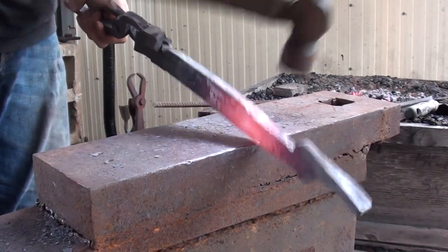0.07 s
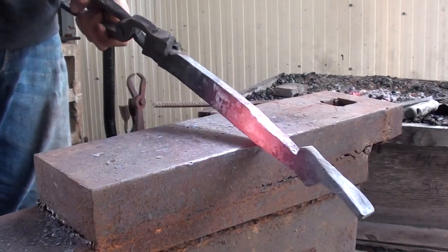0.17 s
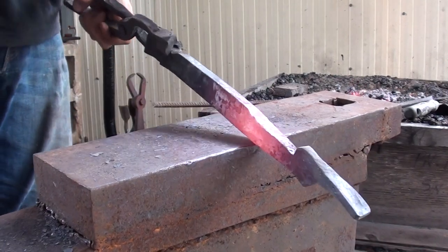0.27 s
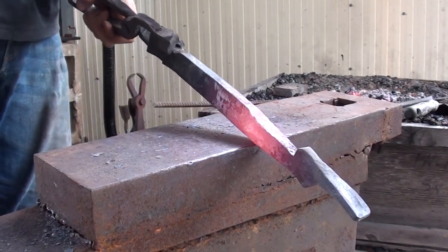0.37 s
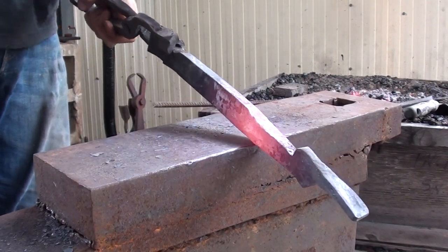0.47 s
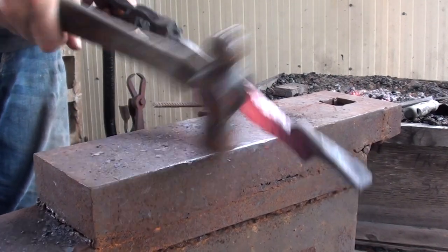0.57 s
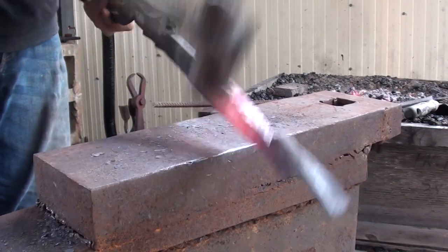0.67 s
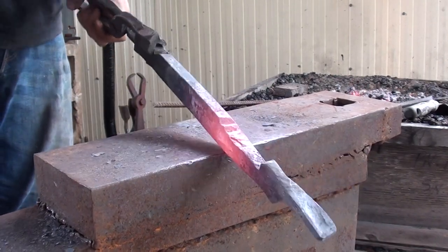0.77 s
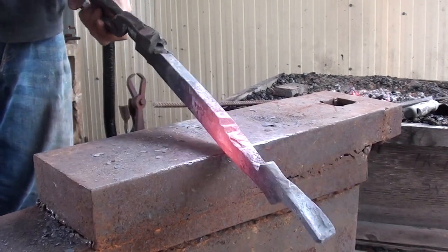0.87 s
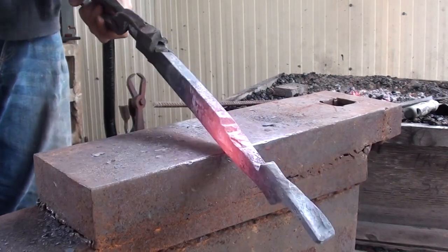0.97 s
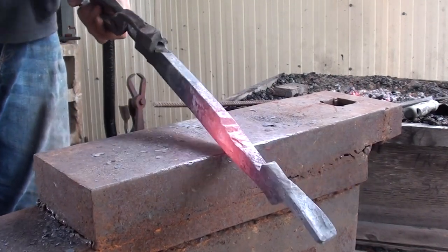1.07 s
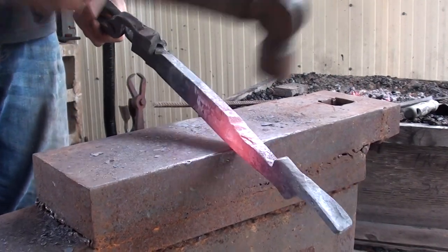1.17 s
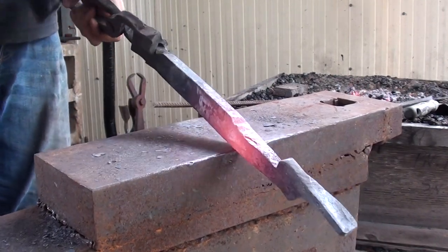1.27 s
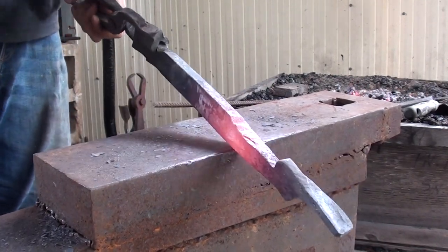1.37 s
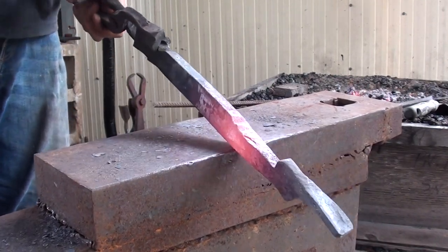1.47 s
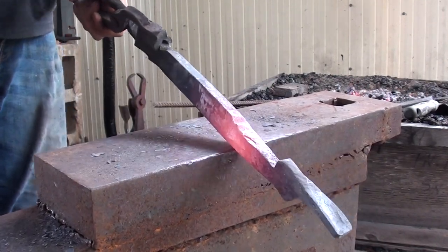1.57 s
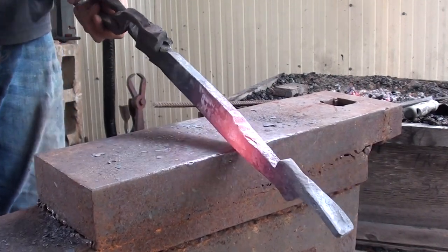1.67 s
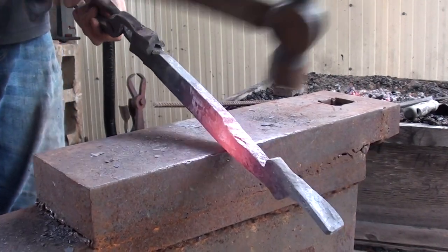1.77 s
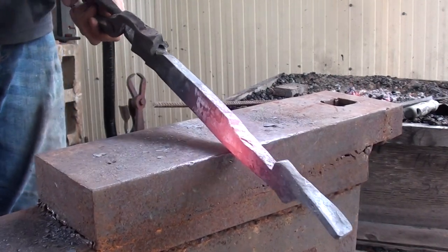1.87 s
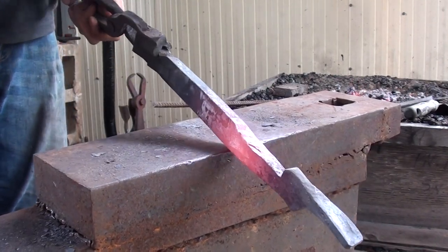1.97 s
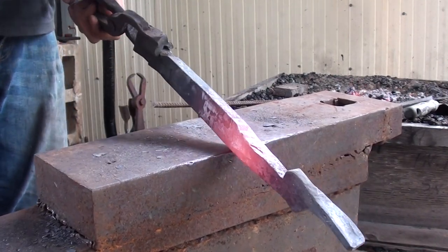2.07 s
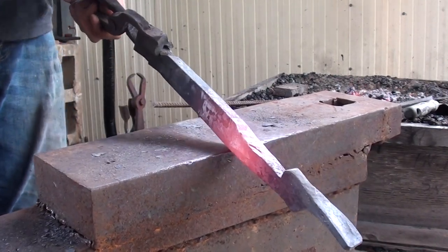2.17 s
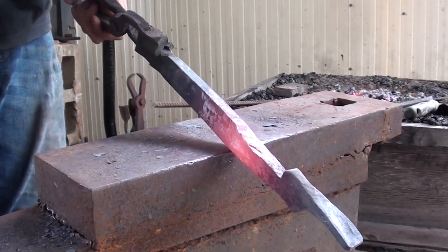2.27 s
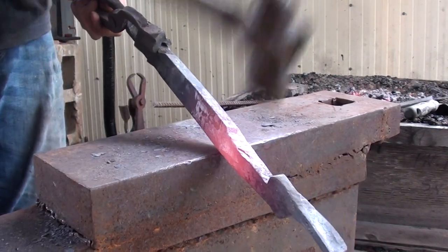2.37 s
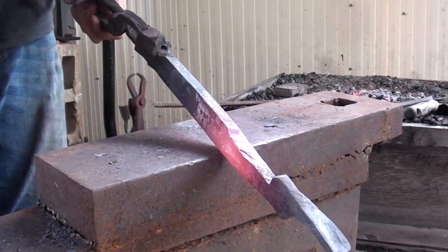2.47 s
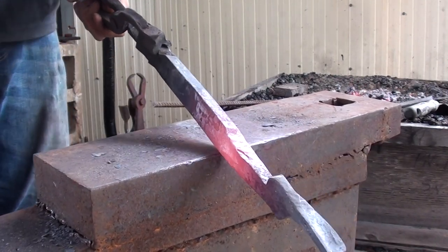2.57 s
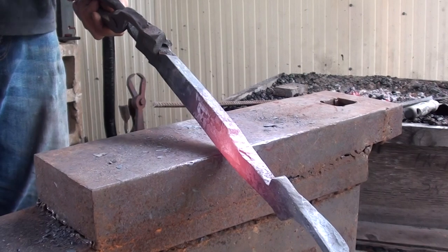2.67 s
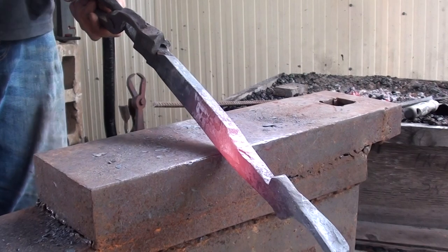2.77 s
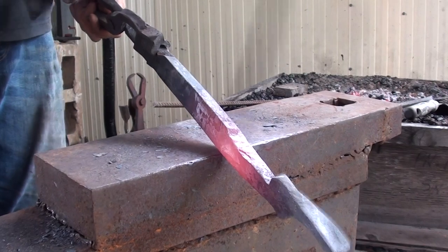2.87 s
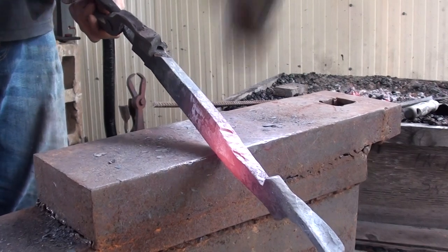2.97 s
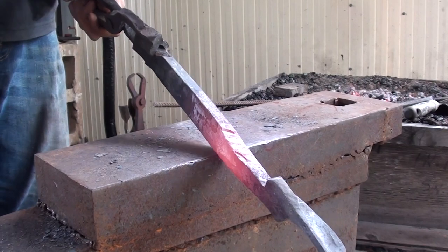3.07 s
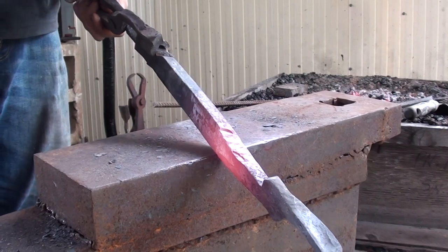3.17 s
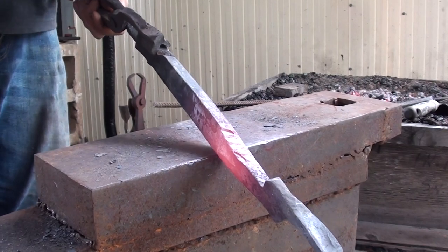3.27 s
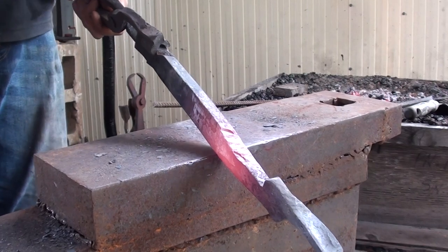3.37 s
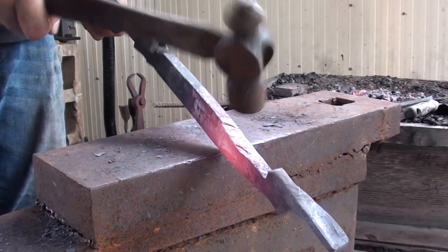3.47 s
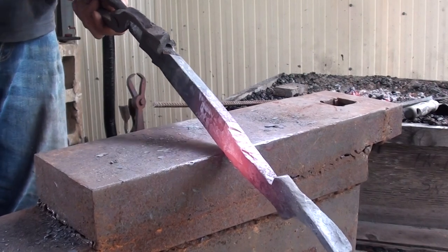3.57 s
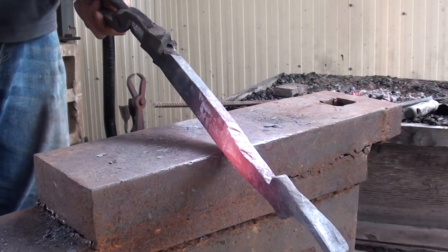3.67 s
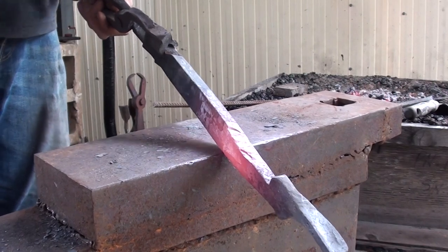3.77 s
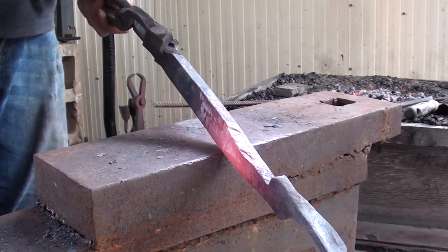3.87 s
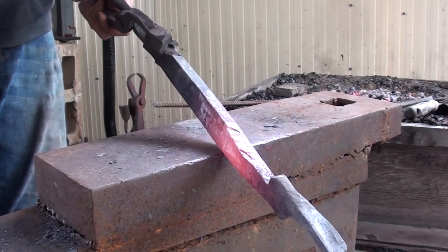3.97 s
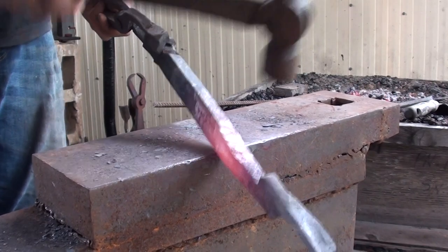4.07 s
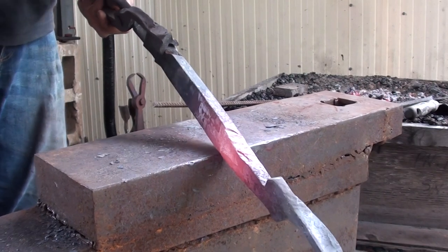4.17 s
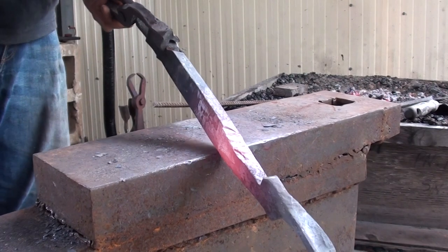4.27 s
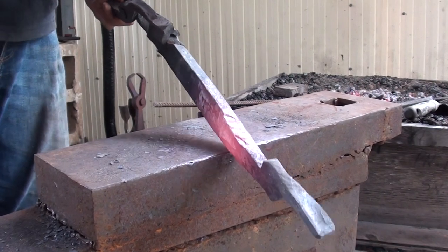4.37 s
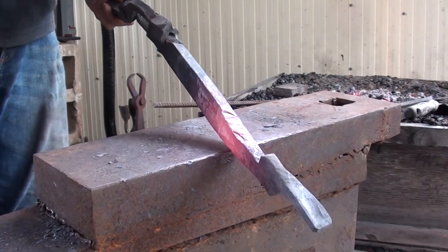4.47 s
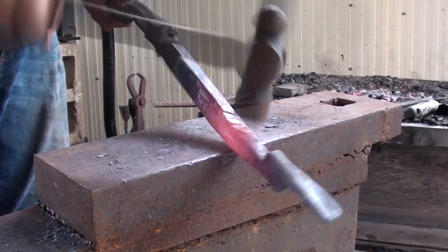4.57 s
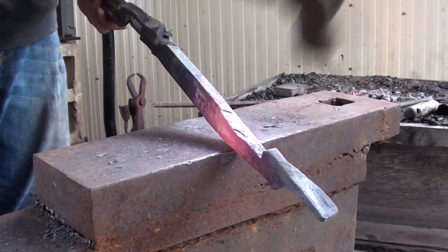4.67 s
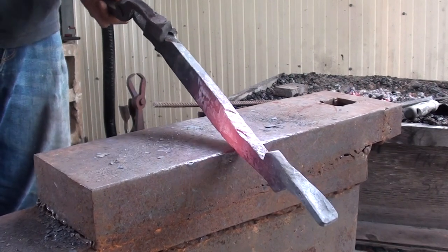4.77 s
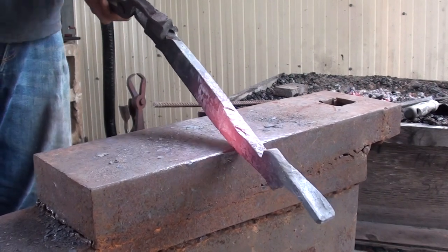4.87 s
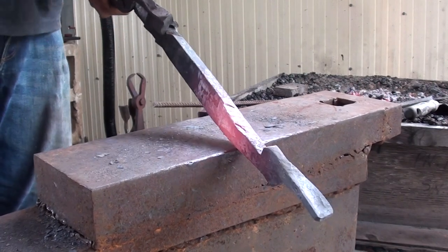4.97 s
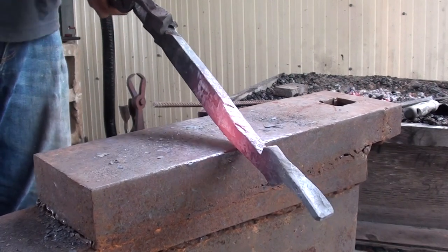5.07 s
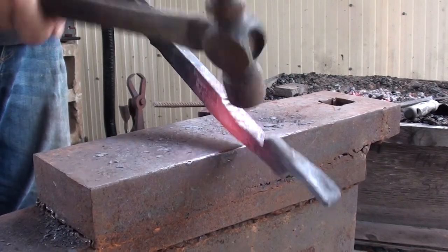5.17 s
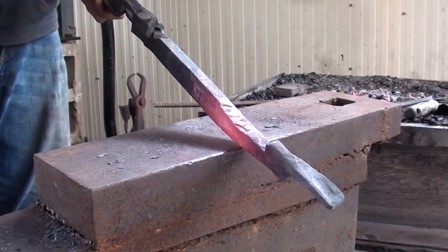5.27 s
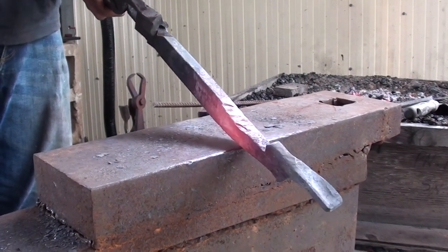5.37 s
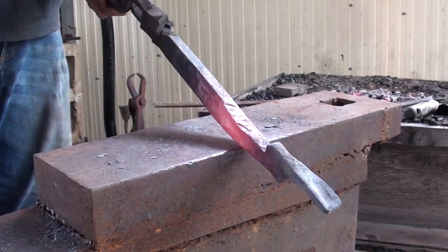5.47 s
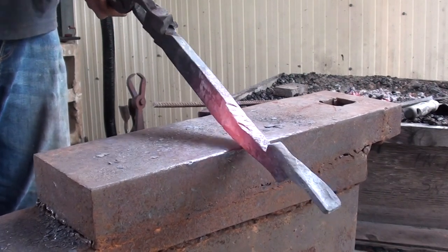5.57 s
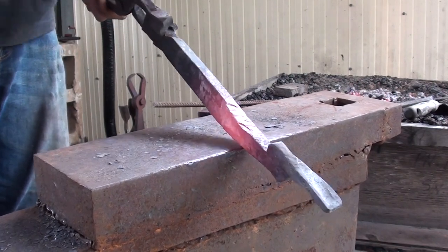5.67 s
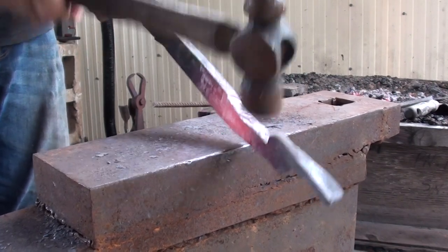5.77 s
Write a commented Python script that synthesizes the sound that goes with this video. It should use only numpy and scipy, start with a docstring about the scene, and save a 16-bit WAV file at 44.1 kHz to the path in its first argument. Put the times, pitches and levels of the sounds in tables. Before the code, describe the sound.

A hammer strikes a hot steel bar on an anvil eleven times at a steady pace, a little under two blows a second. Each blow is a sharp crack with a short, bright metallic ring that varies slightly. After the second, the hammer bounces lightly on the bare anvil. Faint gritty scrapes fall between the blows, over the quiet rush of a forge fire. The microphone is close, in a workshop with a short echo.

```python
"""In a smithy, a red-hot steel bar is hammered over the edge of an anvil in steady blows.
Each impact excites the modes of anvil, bar and hammer, coloured by the spot hit, and the room answers.
Once the hammer drops back lightly on the bare anvil. Between blows the bar scrapes and scale ticks
over the low rush of the forge. A nearby camera's limiter flattens the start of every blow."""
import sys
import numpy as np
from scipy import signal
from scipy.fft import rfft, irfft, next_fast_len
from scipy.io import wavfile
from scipy.ndimage import uniform_filter1d, minimum_filter1d, map_coordinates

SR = 44100
rng = np.random.default_rng(int(sys.argv[2]) if len(sys.argv) > 2 else 0)


def log_audio(samples):
    """Write samples as a 16-bit WAV file to the path given in sys.argv[1]."""
    # one column per channel
    frames = np.atleast_2d(samples).T
    # limit to full scale, then quantise
    limited = np.clip(frames, -1, 1)
    pcm = np.round(limited * 32767).astype(np.int16)
    wavfile.write(sys.argv[1], SR, pcm)


N = 256000

# Noise spectra. Each row: frequency in Hz, relative spectral density in dB.
FORGE_SPECTRUM = [(15, -61), (25, -34), (80, -14.5), (263, -18.5), (439, -19), (575, -20.5), (641, -18),
                  (840, -20.5), (1400, -22), (1520, -33.5), (1790, -24.5), (3820, -31.5), (6050, -27),
                  (6740, -30.5), (16000, -45.5)]
CRACK_SPECTRUM = [(30, -29), (150, -14), (450, -3.5), (1000, -4), (2100, 8.5), (3000, -1), (5500, 3),
                  (7500, 3.5), (10000, -3.5), (12500, -10.5), (15000, -17), (16800, -36)]
ECHO_SPECTRUM = [(25, -31), (70, -27), (120, -10), (240, -17), (450, -0.5), (900, 7), (1400, -2),
                 (2100, 13), (2800, -2.5), (3700, 7), (4500, 1), (7400, 4.5), (9500, -4), (15000, -26)]
FLAKE_SPECTRUM = [(2000, -16), (6000, -9), (8500, 0), (11000, -4), (16000, -12)]
GRIT_SPECTRUM = [(400, -22), (950, 0), (1500, -10), (2400, 0), (4000, 0), (7500, -2), (9200, -18),
                 (15000, -34)]
# Hammer blows. Each row: start in seconds, force in dB, spot along the bar in cm, anvil hum in dB.
BLOW_EVENTS = [(0.0353, 1, 7.9, -2.5), (0.5978, -0.5, 2.81, -5.5), (1.174, -0.5, 8.0, -0.5),
               (1.76, 0.6, 7.44, -1), (2.3375, 0, 14.56, -1.5), (2.912, -1.35, 7.29, -1),
               (3.484, 0, 3.2, -0.5), (4.06, 0.04, 15.29, 0), (4.6222, -3, 4.68, -3.5),
               (5.1913, -0.36, 11.97, -5), (5.7588, -0.6, 15.71, -4)]
# Modes of anvil, bar and hammer, in families that are excited together.
# Each row: frequency in Hz, relative level in dB, 60 dB decay time in seconds, build-up in seconds.
HUM_MODES = [(105.8, -38, 0.38, 0.009), (163.8, -28.5, 0.22, 0.009), (565.6, -24, 0.55, 0.045),
             (581, -20, 0.57, 0.032), (583, -46, 3.4, 0.026), (841, -27, 0.44, 0.0089),
             (969, -13, 0.1, 0.00058), (1008, -18.5, 0.37, 0.0035), (1211.5, -2, 0.24, 0.053),
             (1263, -27, 0.46, 0.028)]
CLANG_MODES = [(1629, 1, 0.21, 0.088), (1903.7, -2.5, 0.31, 0.0019), (2023, -12, 0.44, 0.00083),
               (2120, -8.5, 0.17, 0.00087)]
BELL_MODES = [(2371, -1, .35, .007), (2469, -16, .3, .005), (2928, -28, .33, .01)]
CHIME_MODES = [(3840, -20, .42, .005), (4170, -15, .05, .001), (4219, -17.5, .24, .002)]
CLASH_MODES = [(3450, -29, .33, .003), (3620, -26, .33, .005), (5290, -25, .3, .001), (5545, -21, .3, .001),
               (5960, -26, .35, .01), (6265, -25, .35, .01), (6900, -22, .14, .001), (7385, -25, .28, .001)]
PING_MODES = [(8770, -30, .3, .001), (8832, -27, .35, .001), (8880, -32, .3, .001)]
TINK_MODES = [(10750, -38, .33, .001), (10825, -36, .34, .001), (10885, -37, .33, .001)]
KNOCK_MODES = [(880, -22, .3, .008), (958, -17, .4, .008), (1023, -20, .35, .008)]
# Reverberation of the workshop. Each row: frequency in Hz, 60 dB decay time in seconds.
ROOM_T60 = [(100, 0.62), (500, 0.34), (1000, 0.47), (3000, 0.4), (7000, .39), (10000, 0.35), (15000, 0.34)]
# Small sounds between blows. Each row: start in seconds, level in dB.
FLAKE_EVENTS = [(.3445, -25.5)]
SCRAPE_EVENTS = [(0.3757, -33), (0.443, -30.5), (0.9123, -31), (1.1169, -37.5), (1.506, -34),
                 (2.0814, -29.5), (2.1864, -33), (2.6531, -32.5), (2.7516, -39), (3.7805, -32),
                 (4.3909, -27), (5.511, -34)]
REBOUND_EVENTS = [(0.7449, -15.5)]
# Likeness of the two channels. Each row: frequency in Hz, correlation from 0 to 1.
STEREO_COHERENCE = [(60, 1), (250, .985), (600, .95), (4000, .93), (8000, .97), (12000, .99)]
# Direction of the sound. Each row: frequency in Hz, left minus right level in dB.
STEREO_BALANCE = [(250, 0), (1000, 1.5), (2000, 1.3), (4000, .4), (12000, .1)]


def amp(db):
    """Amplitude grows tenfold for every 20 dB."""
    return 10 ** (np.asarray(db) / 20)


def along(points, hz):
    """Interpolation of (Hz, value) points on a logarithmic frequency axis."""
    frequencies, values = np.transpose(points)
    return np.interp(np.log(hz + 1), np.log(frequencies), values)


def filtered(x, response):
    """Linear filtering: the spectrum of x is multiplied by a frequency response."""
    n = x.shape[-1]
    padded = next_fast_len(n + 8192)
    return irfft(rfft(x, padded) * response(np.fft.rfftfreq(padded, 1 / SR)), padded)[..., :n]


def wobble(rate, n):
    """Smooth random modulation: a spline through rate knots a second."""
    knots = rng.standard_normal(1024)
    coarse = np.arange(0, n + 64, 64)
    return np.interp(np.arange(n), coarse, map_coordinates(knots, [coarse * rate / SR], mode="wrap"))


def noise(spectrum, n):
    """Partial coherence: coloured noise of rms 1, almost alike at two nearby points."""
    def response(hz):
        angle = np.arccos(np.clip(along(STEREO_COHERENCE, hz), -1, 1)) / 2
        return amp(along(spectrum, hz)) * [np.cos(angle), np.sin(angle)]
    mid, side = filtered(rng.standard_normal((2, n)), response)
    pair = np.array([mid + side, mid - side])
    return pair / np.sqrt(np.mean(pair ** 2) + 1e-20)


def ripple(depth_db, size):
    """Modal overlap: countless weak modes make a random, uneven frequency response."""
    ripple_db = depth_db * rng.standard_normal(size)
    return lambda hz: amp(np.interp(np.sqrt(hz), np.linspace(0, np.sqrt(SR / 2), size), ripple_db))


def add(track, start_s, sound):
    """Superposition: a sound adds to the track from its start time."""
    part = track[:, max(round(start_s * SR), 0):][:, :sound.shape[-1]]
    part += sound[..., :part.shape[-1]]


def forge():
    """Broadband noise of the coal fire: a low rush whose hiss comes and goes a little."""
    rush = amp(-54 + .5 * wobble(2.1, N)) * noise(FORGE_SPECTRUM, N)
    hiss = filtered(rush, lambda hz: hz ** 2 / (hz ** 2 + 1800 ** 2))
    return rush - hiss + amp(1.6 * wobble(8, N)) * hiss


def crack(t):
    """Impact noise lasts while the hammer squashes the bar; near surfaces then scatter it."""
    squash = amp(-5) * np.exp(-(t / .0069) ** 2)
    scatter = amp(-8.5 - 60 * t / .14)
    attack = 1 - np.exp(-t / .00019)
    return (squash + scatter) * attack * filtered(noise(CRACK_SPECTRUM, len(t)), ripple(4, size=40))


def ring(modes, t, flutter, flutter_hz, spread):
    """Damped modes: as reflections pile up, interference makes each waver in amplitude and phase."""
    def phasor():
        return wobble(flutter_hz, len(t)) + 1j * wobble(flutter_hz, len(t))
    out = np.zeros((2, len(t)))
    depth = flutter * (1 - np.exp(-t / .02))
    for hz, db, t60, build_s in modes:
        waver = 1 + depth * phasor()
        side = spread * min(hz / 600, 1) * phasor()  # long waves reach both channels alike
        envelope = amp(db + rng.standard_normal() - 60 * t / t60) * (1 - np.exp(-t / build_s))
        tone = envelope * np.exp(2j * np.pi * (hz * t + rng.random()))
        out += np.real(tone * [waver + side, waver - side])
    return out


def struck(modes, spot_cm):
    """Standing waves: a mode is excited weakly near a node, and higher modes have closer nodes."""
    spacing_at_1khz_cm, share_at_node = 5.94, .03
    hz, db, t60, build_s = np.transpose(modes)
    spacing_cm = spacing_at_1khz_cm / np.sqrt(hz / 1000)
    share = share_at_node + (1 - share_at_node) * np.cos(np.pi * spot_cm / spacing_cm) ** 2
    return np.transpose([hz, db + 20 * np.log10(share), t60, build_s])


def echo(t, build_s):
    """Reverberation: the crack scatters round the workshop, swells and decays, the bass lasting longest."""
    hz, when, spectra = signal.stft(noise(ECHO_SPECTRUM, len(t)), SR, nperseg=256)
    decay = amp(-60 * when / along(ROOM_T60, hz)[:, None])
    tail = signal.istft(spectra * decay, SR, nperseg=256)[1]
    return tail[:, :len(t)] * (1 - np.exp(-t / build_s))


def hammer(walls):
    """Impulse excitation: each blow cracks, sets the steel ringing and stirs the room."""
    out, hum_t = np.zeros((2, N)), np.arange(SR) / SR
    t = hum_t[:SR * 3 // 5]
    flash = 1 + amp(10 - 60 * t / .054)  # the highest modes arrive directly, then as a blurred echo
    for start_s, force_db, spot_cm, hum_db in BLOW_EVENTS:
        hum = ring(HUM_MODES, hum_t, flutter=.24, flutter_hz=25, spread=.12)
        steel = amp(.03) * ring(CLANG_MODES, t, flutter=.27, flutter_hz=35, spread=.13)
        steel += amp(-.5) * ring(struck(BELL_MODES, spot_cm), t, flutter=.17, flutter_hz=30, spread=.13)
        steel += amp(3.5) * ring(struck(CHIME_MODES, spot_cm), t, flutter=.35, flutter_hz=55, spread=.13)
        steel += amp(1.5) * ring(CLASH_MODES, t, flutter=.96, flutter_hz=210, spread=.32)
        for modes, db in (PING_MODES, 11.5), (TINK_MODES, 9.5):
            shimmer = ring(struck(modes, spot_cm), t, flutter=.93, flutter_hz=120, spread=.066)
            steel += amp(db) * flash * shimmer
        room = amp(-5.5) * filtered(echo(t, build_s=.018), walls)
        contact = amp(-3 + 2.1 * force_db) * crack(t)  # grows faster with force than the ring does
        add(out, start_s, amp(force_db) * (steel + room) + contact)
        add(out, start_s, amp(hum_db) * hum)
    return out


def flake():
    """Brittle fracture: a flake of cooling scale snaps off with one bright tick."""
    out, t = np.zeros((2, N)), np.arange(SR // 8) / SR
    envelope = amp(-60 * t / .006) + amp(-26 - 60 * t / .25)
    for start_s, db in FLAKE_EVENTS:
        add(out, start_s, amp(db) * envelope * noise(FLAKE_SPECTRUM, len(t)))
    return out


def scrapes():
    """Friction: as the tongs shift or the bar settles, each slip gives gritty ticks and a dull knock."""
    out, t = np.zeros((2, N)), np.arange(SR // 4) / SR
    settle_s, scatter_s, settle_db = .44, .06, -37  # two faint slips follow each blow
    settling = [(blow[0] + settle_s + scatter_s * late, settle_db + 2 * louder)
                for blow in BLOW_EVENTS for late, louder in rng.standard_normal((2, 2))]
    for start_s, db in list(SCRAPE_EVENTS) + settling:
        ticks = amp(-60 * t / .012) + amp(-15 - 60 * t / .17)  # the first tick, smeared by the room
        for delay_s, strength in rng.random((4, 2)) * [.012, .8]:
            ticks += strength * (t > delay_s) * amp(-60 * np.abs(t - delay_s) / .009)
        knock = amp(-4.5) * ring(KNOCK_MODES, t, flutter=.3, flutter_hz=40, spread=.1)
        grit = amp(-10.5) * ticks * noise(GRIT_SPECTRUM, len(t))
        add(out, start_s, amp(db) * (grit + knock))
    return out


def rebound(walls):
    """Free vibration: with no soft steel under it, a light tap gives a dull crack and a clear ring."""
    out, t = np.zeros((2, N)), np.arange(SR * 3 // 5) / SR
    families = [(CLANG_MODES, -10), (BELL_MODES, 4.5), (CHIME_MODES, 12), (CLASH_MODES, -5.5)]
    for start_s, db in REBOUND_EVENTS:
        steel = sum(amp(family_db) * ring(modes, t, flutter=.23, flutter_hz=38.3, spread=.13)
                    for modes, family_db in families)
        tap = filtered(crack(t), lambda hz: 1 / (1 + (hz / 9000) ** 4))
        room = amp(-11.5) * filtered(echo(t, build_s=.017), walls)
        add(out, start_s, amp(db) * (tap + steel + room))
    return out


def scene():
    """The sources superpose, and a level difference places them a little to the left."""
    walls = ripple(depth_db=1.22, size=512)  # the same colour for every echo
    mix = hammer(walls) + rebound(walls) + scrapes() + flake() + forge()
    return filtered(mix, lambda hz: amp(np.outer([.5, -.5], along(STEREO_BALANCE, hz))))


def limiter(x, threshold_db, release_db_per_s, grip):
    """Compression: gain drops by a share (grip) of the level above the threshold, then recovers."""
    power = np.abs(uniform_filter1d(np.mean(x ** 2, axis=0), size=130))
    needed_db = grip * np.maximum(10 * np.log10(power + 1e-12) - threshold_db, 0)
    release_db = release_db_per_s * np.arange(N) / SR
    cut_db = np.maximum.accumulate(needed_db + release_db) - release_db
    gain = minimum_filter1d(amp(-cut_db), size=25)
    return x * uniform_filter1d(gain, size=25)


def record(dry):
    """The camera limits the blows, rounds the last peaks by saturation and passes nothing above 16 kHz."""
    held = limiter(dry, threshold_db=-12, release_db_per_s=132.5, grip=.84)
    rounded = held / (1 + (held / .85) ** 6) ** (1 / 6)
    return filtered(rounded, lambda hz: hz < 16000)


dry = scene()
out = record(dry)
log_audio(out)
```